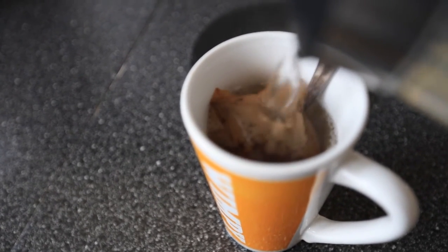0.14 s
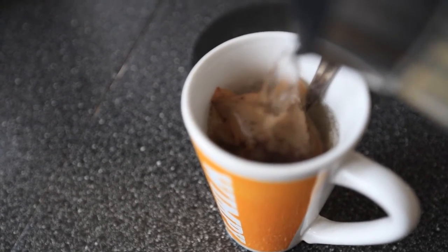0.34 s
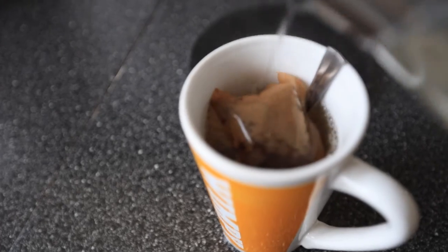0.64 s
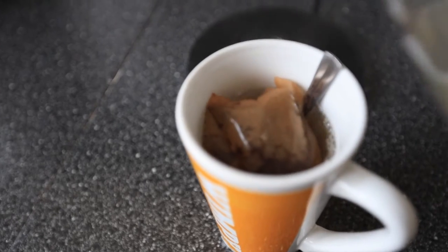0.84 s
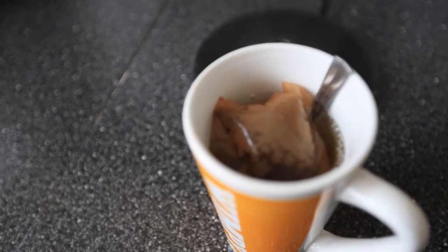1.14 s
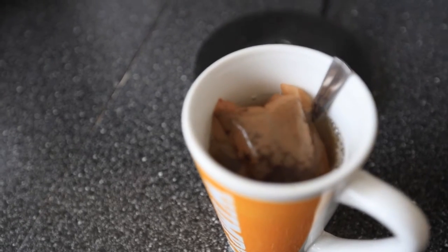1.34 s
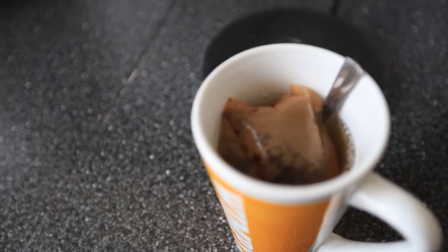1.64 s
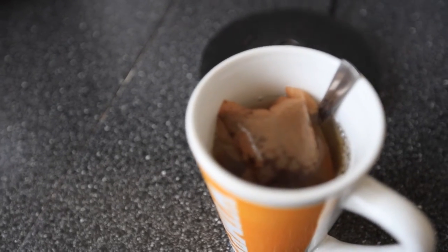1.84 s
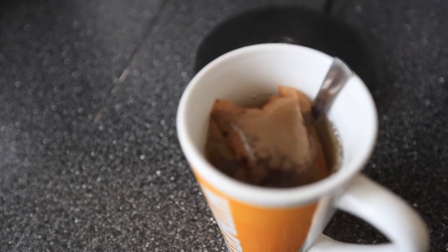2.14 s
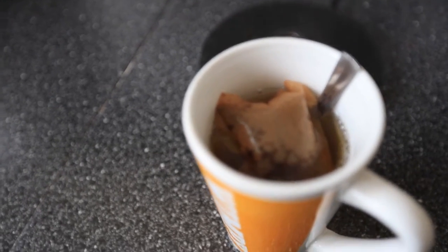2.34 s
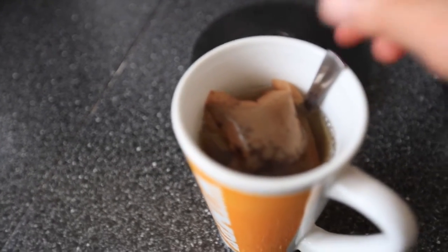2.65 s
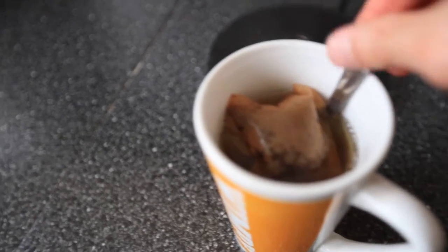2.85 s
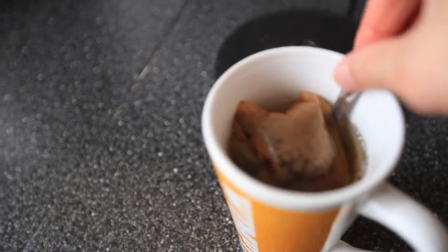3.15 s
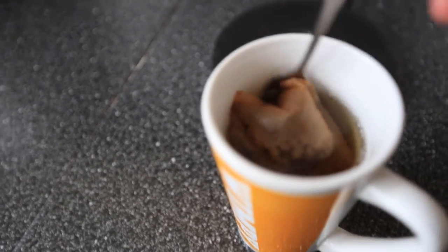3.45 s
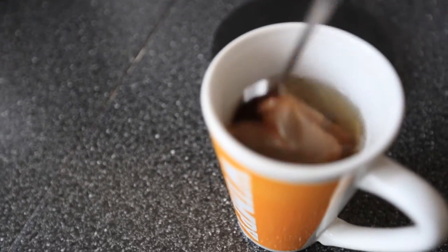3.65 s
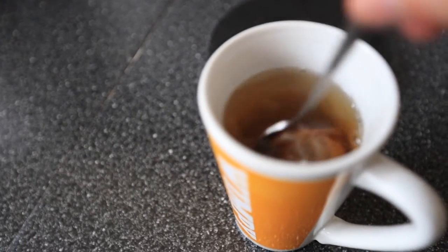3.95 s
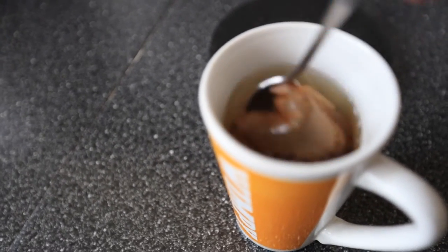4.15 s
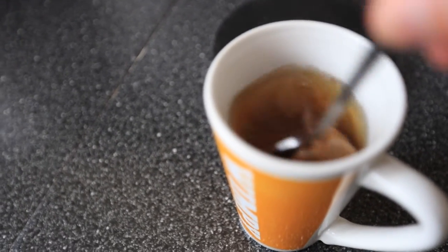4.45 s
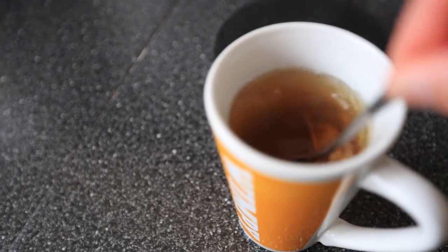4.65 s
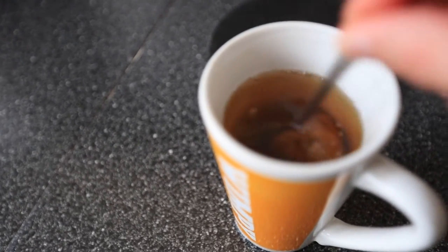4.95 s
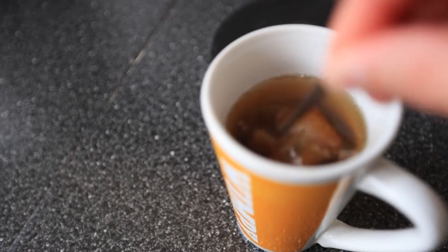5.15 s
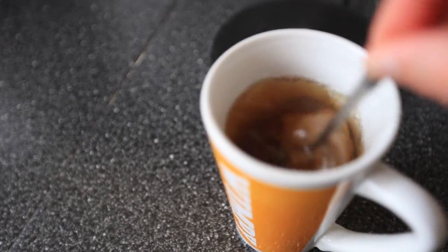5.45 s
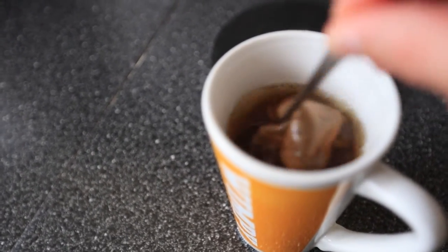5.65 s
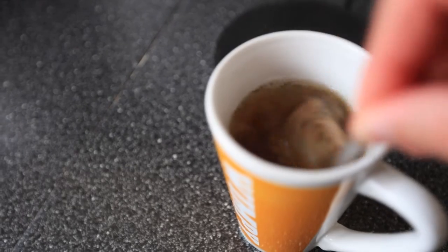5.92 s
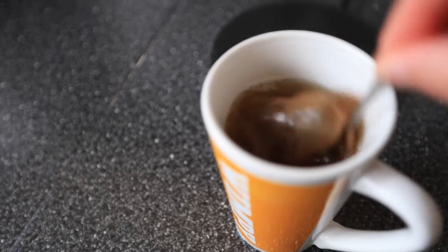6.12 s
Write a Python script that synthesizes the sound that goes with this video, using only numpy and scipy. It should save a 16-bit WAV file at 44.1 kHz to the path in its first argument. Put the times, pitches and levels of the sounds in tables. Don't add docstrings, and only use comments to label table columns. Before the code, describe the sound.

Sparse water drips, a heavy kettle clack with rattling, soft floor thuds, and bright spoon knocks against a filled ceramic mug in a quiet kitchen.

```python
import sys
import numpy as np
from scipy import signal
from scipy.fft import rfft, irfft
from scipy.io import wavfile
from scipy.ndimage import uniform_filter1d

SR = 44100
rng = np.random.default_rng(int(sys.argv[2]) if len(sys.argv) > 2 else 0)


def digitize_waveform(pressure):
    field = np.atleast_2d(pressure).T
    bounded = np.clip(field, -1, 1)
    quanta = np.round(bounded * 32767).astype(np.int16)
    wavfile.write(sys.argv[1], SR, quanta)


def nominal_scale(level):
    x = np.asarray(level, float) / 20
    return 10 ** x


N = 276948
T = np.arange(N) / SR

GROUP_HZ = [2100, 3400, 4800, 5900, 7300]


def band(x, lo_hz, hi_hz):
    edges = [lo_hz, min(hi_hz, .45 * SR)]
    return signal.sosfilt(signal.butter(2, edges, "band", fs=SR, output="sos"), x)


def noise(lo_hz, hi_hz):
    x = band(rng.standard_normal(N), lo_hz, hi_hz)
    return x / x.std()


def walk(rate):
    k = int(SR / rate)
    steps = np.repeat(rng.standard_normal(N // k + 1), k)
    x = uniform_filter1d(uniform_filter1d(steps, k), k)[:N]
    return x / x.std()


def decay(t, t60):
    return np.exp(-np.log(1000) * t / t60)


def mode(x, hz, t60):
    r, w = decay(1 / SR, t60), 2 * np.pi * hz / SR
    return signal.lfilter([0, r * np.sin(w)], [1, -2 * r * np.cos(w), r * r], x + 1e-18)


def ring(x, modes):
    return sum((-1) ** k * nominal_scale(db) * mode(x, hz, t60) for k, (hz, db, t60) in enumerate(modes))


def clicks(s, size):
    x = np.zeros(N)
    np.add.at(x, (np.asarray(s) * SR).astype(int), size)
    return x


def curve(rows, column):
    rows = np.array(rows)
    return nominal_scale(np.interp(T, rows[:, 0], rows[:, column], left=-120, right=-120))


def fade(s, rise, t60):
    out, i = np.zeros(N), int(s * SR)
    t = T[:min(N - i, int(1.5 * t60 * SR))]
    out[i:i + len(t)] = np.minimum(t / max(rise, 1e-4), 1) * decay(t, t60)
    return out


def grit(per_s):
    x = (rng.random(N) < per_s / SR) * rng.standard_normal(N)
    return x / x.std()


def shares(knocks, share_db):
    place_db = [0, 10, 0, -18, 0]
    k = np.array(knocks)
    octaves = np.log2(np.array(GROUP_HZ) / GROUP_HZ[2])
    force_db = k[:, 1:2] + share_db + k[:, 2:3] * octaves + k[:, 3:] * place_db
    return np.hstack([k[:, :1], force_db])


def knock(rows, modes_hz, modes, contact_s, first, crack_db):
    # f/Hz, level under the ring/dB
    crack_bands = [(1600, -14), (2700, -5.5), (3900, -8), (5300, -4), (6600, -4), (9000, -10.5),
                   (13000, -9.5)]
    out, t = 0, T[:800]
    chatter = rng.standard_normal((len(rows), len(t))) * np.exp(-t / contact_s) * 0.074
    chatter[:, 0] = first
    for k, (hz, (db, t60)) in enumerate(zip(modes_hz, modes)):
        force = np.zeros(N)
        for row, contact in zip(rows, chatter):
            i = int(row[0] * SR)
            total = max(abs(contact @ np.exp(2j * np.pi * hz * t)), .5)
            force[i:i + len(t)] += nominal_scale(np.interp(hz, GROUP_HZ, row[1:]) + db) * contact / total
        out = out + (-1) ** k * mode(force, hz, t60)
    for hz, db in crack_bands:
        crack = 0
        for row in rows:
            level_db = np.interp(hz, GROUP_HZ, row[1:]) + db + crack_db
            crack = crack + nominal_scale(level_db) * fade(row[0], 0.0016, 0.031)
        out = out + crack * noise(hz / 1.317, hz * 1.1)
    return out


def spoon_knocks():
    # t/s, force/dB, hardness/dB per octave, place round the wall (-0.6 to 1.4)
    tap_knocks = [
        (3.0234, -32, 2, 0),
    ]
    high_knocks = [
        (3.2276, -17.5, -0.5, 0.75),
        (3.248, -30, 5, .5),
        (3.2944, -37.5, -7, 0.74),
    ]
    side_knocks = [
        (3.3515, -61, 8, 1.4),
        (4.2996, -20.5, 0.9, -0.23),
        (4.3164, -23.5, -2, -0.6),
    ]
    deep_knocks = [
        (5.0435, -17.5, 1.7, 0.022),
        (5.7, -21, -2, 0.016),
    ]
    last_knocks = [
        (5.9748, -20, 0, 0.0028),
        (5.9785, -21, 0.0043, 0),
    ]
    mug_hz = [2006, 2112, 2850, 3370, 3800, 4400, 4785, 5300, 5905, 5975, 6735, 7060, 7660, 9700, 10450,
              11120, 12550, 13370, 15150]
    deep_hz = [1985, 2138, 2850, 3375, 3854, 4600, 4915, 5170, 5832, 5882, 6730, 7085, 7375, 7650, 8500,
               9636, 10440, 12670]
    tap_hz = [1981, 3000, 4834, 5975, 7068, 8086, 10070, 11280]
    last_hz = [1640, 2230, 2850, 3800, 4775, 4830, 5911, 6535, 6971, 7052, 7655, 9609, 11100, 11690, 13370]
    # level/dB, time to die away by 60 dB/s
    rim = [(2, 0.079), (-4, 0.06), (-10, 0.029), (-1, 0.11), (2.5, 0.021), (-42, 0.02), (0.5, 0.046),
           (-17, 0.15), (17, 0.03), (-18, 0.0678), (6, 0.0087), (4.5, 0.051), (-1.5, 0.025), (-15, 0.078),
           (-26, 0.051), (-11, 0.049), (-19.5, 0.066), (-19, 0.066), (-20, .05)]
    side_wall = [(-13, 0.19), (-0.5, 0.092), (3, 0.027), (2.3, 0.044), (-26, 0.052), (-11, 0.067),
                 (-1.5, 0.063), (-21, 0.026), (-11, 0.12), (0, 0.04), (-7, 0.054), (-3, 0.12), (-6.5, 0.18),
                 (-15, 0.07), (-3.5, 0.053), (-4, 0.041), (-22, .07), (-32, .06), (-31, .05)]
    deep = [(-16, 0.27), (2, 0.051), (-29, 0.022), (4.5, 0.17), (-16, 0.04), (-18, 0.046), (-5.5, 0.054),
            (-23, 0.054), (3.5, 0.02), (3, 0.055), (3.5, 0.036), (-1.5, 0.044), (2, 0.034), (5, 0.041),
            (-38, 0.056), (-10.5, 0.048), (-8.5, 0.022), (-19, 0.063)]
    tap = [(-1.5, 0.094), (-20, 0.016), (-3, 0.038), (-8, 0.034), (2.5, 0.04), (-13, 0.026), (-9.5, .04),
           (-23, 0.024)]
    last = [(-10, .03), (-13, 0.028), (-29, .02), (-20, 0.016), (6, 0.077), (-1, 0.044), (-6, .06),
            (-18, 0.048), (3.5, 0.037), (7.5, 0.052), (-8.5, .05), (-8, 0.04), (-4, 0.047), (-13, .05),
            (-22, .05)]
    rim_share_db = [-12.5, -28, -1, -21, -4.5]
    side_share_db = [3.5, 2.5, 2, -1.5, -4.5]
    deep_share_db = [-2.5, -15.5, 2, 0.5, -4]
    out = knock(shares(high_knocks, rim_share_db), mug_hz, rim, 0.0046, 0.19, -.1)
    out = out + knock(shares(side_knocks, side_share_db), mug_hz, side_wall, 0.0022, 0.43, -.1)
    out = out + knock(shares(deep_knocks, deep_share_db), deep_hz, deep, 0.0045, 0.53, -.1)
    out = out + knock(shares(tap_knocks, 0), tap_hz, tap, 0.0035, 0.26, -3)
    return out + knock(shares(last_knocks, 0), last_hz, last, 0.0021, 0.24, -13)


def scrape(strokes, modes_hz, modes):
    at_rim_db = [-5, -26, -23, 11.5]
    deep_down_db = [-17.5, 0.5, -28, -16.5]
    # f/Hz, level/dB, time to die away by 60 dB/s
    rasp_modes = [(8700, 0, .012), (9700, -1, .02), (10450, 1, .02), (11120, -11, 0.018), (12550, -5, .025),
                  (13600, -6, .02), (14500, -3, .015), (15200, -2, .02)]
    rows = np.vstack(strokes)
    pressure = uniform_filter1d(sum(curve(part, column=1) for part in strokes), size=400)
    depth = np.interp(T, rows[:, 0], rows[:, 2])
    gains = [pressure * nominal_scale(rim_db + depth * (deep_db - rim_db))
             for rim_db, deep_db in zip(at_rim_db, deep_down_db)]
    upper = np.clip((depth - 0.51) / (0.95 - 0.51), 0, 1)
    out = nominal_scale(-6.0) * gains[0] * (noise(300, 780) + noise(940, 2100.0))
    rasp = ring(grit(per_s=4600), rasp_modes)
    out = out + nominal_scale(-17 + 3.4 * walk(60)) * gains[3] * rasp / rasp.std()
    for k, (hz, (db, t60)) in enumerate(zip(modes_hz, modes)):
        sound = mode(grit(per_s=700), hz, t60)
        if hz < 4000:
            sound = sound / uniform_filter1d(abs(sound), size=1300) ** .6
        share = {2: 1 - upper, 3: upper}.get(k, 1)
        group = np.searchsorted([1800, 3000, 4200], hz)
        out = out + nominal_scale(db + 3.6 * walk(45)) * share * gains[group] * sound / sound.std()
    return out


def spoon_scrapes():
    # t/s, pressure/dB, depth (0 rim, 1 deep)
    strokes = [
        [(2.93, -73, .3), (2.95, -44, 0.85), (3.0, -68, .05), (3.05, -61, .4), (3.096, -71, 0.06),
         (3.146, -63, .02), (3.2, -56.5, .05)],
        [(3.229, -38, .1), (3.255, -35, 0.36), (3.275, -36, 0.53), (3.321, -45, 0.35), (3.345, -36.5, 0.81),
         (3.363, -39.5, 0.71), (3.471, -46, 0.87), (3.5, -62, .1)],
    ]
    last_strokes = [
        [(5.99, -28.5, 0.27), (6.025, -42, 0.36), (6.058, -37.5, 0.59), (6.08, -39.5, 0.99), (6.112, -46, 1),
         (6.128, -41.5, 1), (6.175, -41.5, 0.8), (6.195, -62, 0.95), (6.275, -70, 0.79)],
    ]
    scraped_hz = [1200, 1270, 2006, 2125, 3370, 4785, 5905, 5975, 6735, 7060, 7660]
    last_scraped_hz = [1050, 1290, 1945, 2120, 1630, 1760, 2250, 2570, 4775, 6971, 7052, 9500, 11100]
    # level/dB, time to die away by 60 dB/s
    scraped = [(1, 0.035), (2, 0.064), (-4.5, 0.049), (-2.5, 0.18), (8, 0.22), (-20.5, .12), (-19.5, 0.048),
               (-15, 0.054), (-26, .1), (-19, 0.16), (-14.5, 0.11)]
    last_scraped = [(-10, .03), (-5, 0.033), (7, 0.081), (3, 0.31), (-10, .06), (-14, .06), (-14, .03),
                    (-31, 0.055), (-14, 0.034), (-13, .06), (-16, .06), (-24, .06), (-25, .05)]
    return scrape(strokes, scraped_hz, scraped) + scrape(last_strokes, last_scraped_hz, last_scraped)


def jolts():
    # t/s, worktop level/dB, handle level/dB
    shaken = [
        (3.024, -58, -32),
        (3.226, -41, -36),
        (4.302, -39.5, -41),
        (5.041, -34, -40.5),
        (5.7, -37.5, -42),
        (5.974, -37.5, -27.5),
    ]
    # f/Hz, level/dB, time to die away by 60 dB/s
    handle = [(1044, -5.5, 0.086), (1195, 2.5, 0.051), (1290, 1, 0.052), (1770, -34, 0.03488)]
    out, tea = 0, noise(245.0, 890)
    worktop_hz, t60 = 164, 0.18
    for s, top_db, handle_db in shaken:
        out = out + nominal_scale(top_db) * fade(s, 0.01, t60) * np.sin(2 * np.pi * worktop_hz * (T - s))
        out = out + nominal_scale(-41) * fade(s, 0.0049, t60) * tea
    rows = np.array(shaken)
    return out + ring(clicks(rows[:, 0], nominal_scale(rows[:, 2] - 1.5)), handle)


def drops():
    # t/s, peak level/dB, snap f/Hz, splash above 4 kHz level/dB
    water_drops = [(0.0094, -41, 1290, -47), (0.0581, -31.5, 3070, -54), (0.065, -39, 1310, -58),
                   (0.2646, -46, 6400, -45), (0.2752, -44, 6490, -43.5), (0.2837, -34.5, 3420, -59),
                   (0.2942, -39, 1310, -64), (0.363, -33.5, 8400, -60), (0.3671, -37, 1310, -59),
                   (0.384, -37, 3191, -60), (0.402, -26, 3350, -44), (0.457, -40, 1290, -67),
                   (0.557, -45, 1420, -48.5), (0.593, -38, 2540, -59), (0.6215, -52, 2600, -40),
                   (0.6239, -13.5, 2370, -28), (0.642, -48, 1834, -37), (0.6621, -38, 1090, -52),
                   (0.6651, -23, 1360, -33), (0.6957, -24.5, 3300, -43.5), (0.8354, -43, 1800, -43),
                   (5.3393, -40, 1160, -36.5), (5.3993, -34.5, 1650, -45)]
    # t/s, peak level/dB, snap f/Hz, fine edge level/dB
    dry_ticks = [(1.1403, -38, 5500, -57), (1.5062, -9.5, 1230, -50), (1.84, -30, 1400, -60),
                 (2.107, -18.5, 2190, -42), (2.5592, -42, 3260, -50), (2.9353, -36, 2580, -59),
                 (3.285, -37, 3900, -52), (3.4962, -37, 7100, -57), (3.5127, -20.5, 2470, -63),
                 (4.467, -34.5, 700, -65), (4.5441, -33.5, 3900, -64), (4.571, -38, 3186, -58),
                 (4.581, -37, 2269, -67), (5.932, -40, 1500, -62)]
    # t/s, level/dB
    dribble = [
        (0.0, -44),
        (0.316, -78),
        (0.606, -70),
        (1.0, -53),
    ]
    out, hiss, t = np.zeros(N), noise(3950, 16200), T[:6000]
    lasts = [0.016 * 2 ** ((row[1] + 40) / 20) for row in water_drops] + [0.055] * len(dry_ticks)
    for (s, db, hz, splash_db), t60 in zip(water_drops + dry_ticks, lasts):
        i = int(s * SR)
        snap = -np.sin(2 * np.pi * hz * t) * np.exp(-t * hz / 1.1)
        grain = rng.standard_normal(len(t)) * np.minimum(t / 0.0006, 1) * decay(t, t60)
        spray = band(grain, hz / 2.0, hz * 1.32) * np.sqrt(8000 / hz)
        splash = hiss[i:i + len(t)] * (np.exp(-t / 0.000072) + 0.21 * decay(t, t60))
        out[i:i + len(t)] += nominal_scale(db + 2.5) * snap + nominal_scale(db - 9.5) * spray + nominal_scale(splash_db + 8.5) * splash
    out = out + .9 * band(np.roll(out, int(.0032 * SR)), 3000, 4100)
    fizz = band(grit(per_s=620), 680, 4300)
    return out + curve(dribble, column=1) * nominal_scale(-11) * fizz / fizz.std()


def kettle():
    # t/s, weight/dB, clack/dB, extra when on its edge/dB
    landings = [(1.482, -32, -38.5, 11), (1.5058, 2, -5, 0), (1.529, -23, -32, -1), (1.554, -20, -33, .1),
                (1.61, -5, -16.5, 2.5), (1.637, -11, -19, -11), (1.658, -40, -24, -15),
                (1.7, -23, -24, -26), (1.781, -17, -63, 6), (1.839, -15, -38, 7), (1.86, -1, -24.5, 7),
                (1.905, -2.5, -24, 6), (1.917, -13, -18, 19), (1.939, -10.5, -39, -4), (1.975, -27, -35, 9),
                (2.009, -25, -43, -2)]
    # t/s, level/dB
    slide = [
        (1.5, -68),
        (1.668, -35.5),
        (1.726, -40),
        (1.874, -44),
        (2.1, -60),
    ]
    # f/Hz, level/dB, time to die away by 60 dB/s
    worktop = [(115.6, -2, 0.18), (153.6, 1, 0.059), (200, -5.5, 0.059), (254.5, -8.5, 0.076)]
    base = [(345, -3.5, 0.093), (421, -4, 0.12), (519, -6.5, 0.096), (616, -3.5, 0.06), (692, 2.5, 0.041),
            (787, 1.5, 0.053), (820, -3.5, 0.065)]
    shell = [(932, -8.5, 0.028), (1087, -5.5, 0.041), (1241, -1, 0.038), (1336, -0.5, 0.039),
             (1500, -6.5, 0.032), (1840, -16.5, 0.017), (2070, -22.5, 0.036)]
    blow_db = [-8.5, -11, -9.5]
    rattle_db = [-24, -10.5, -10.5]
    slide_db = [8.5, -0.2, -7, -15.5]
    s, weight, clack, edge = np.transpose(landings)
    base_blow, treble = (weight + clack) / 2 - 13.5 + edge, clack - 19.5 + edge
    rows = np.transpose([s, weight, base_blow, clack, treble])
    out, grind = 0, curve(slide, column=1)
    for k, body in enumerate((worktop, base, shell)):
        rumble = ring(grit(per_s=1700), [(hz, db, 0.23 * t60) for hz, db, t60 in body])
        rattle = sum(nominal_scale(row[k + 1] + rattle_db[k]) * fade(row[0], 0.0012, 0.079) for row in rows)
        sign = 1 if k else -1
        out = out + ring(clicks(rows[:, 0], sign * nominal_scale(rows[:, k + 1] + blow_db[k])), body)
        out = out + rumble / rumble.std() * (grind * nominal_scale(slide_db[k]) + rattle)
    tick = sum(nominal_scale(row[4] - 5.0) * fade(row[0], 0.0036, 0.077) for row in rows)
    tick = tick + grind * nominal_scale(slide_db[3])
    return out + tick * (noise(1500, 3150) + nominal_scale(-11.5) * noise(4400, 8200))


def thuds():
    # t/s, boom/dB, knock/dB, shuffle/dB, time to die away by 60 dB/s
    steps = [(1.95, -44, -60, -70, 0.27), (2.289, -31, -47, -48, 0.15), (2.366, -34.5, -66, -58, 0.39),
             (2.799, -38.5, -45, -71, 0.45), (2.893, -57, -47, -65, 0.46), (2.932, -47, -36, -43, 0.47),
             (3.04, -61, -32.5, -55, 0.67), (3.486, -31, -34, -41, 0.54), (3.511, -40, -24.5, -29.5, 0.41),
             (3.899, -39, -46.5, -69, 0.38), (4.011, -28.5, -31.5, -50, 0.28), (4.465, -52, -25, -42, 0.56),
             (4.553, -21, -34, -62, 0.39), (4.567, -37, -34.5, -35, 0.35), (4.699, -30, -69, -75, 0.25),
             (5.152, -41, -30.5, -39, 0.51)]
    # t/s, level/dB, f/Hz, time to die away by 60 dB/s
    cupboard = [
        (0.622, -25.5, 1900, 0.063),
        (2.106, -28, 2470, 0.095),
        (3.042, -27.5, 350, 0.2),
        (5.5, -40, 740, 0.071),
    ]
    # t/s, level/dB
    heels = [(2.37, -35), (2.892, -43), (3.487, -31.5), (3.528, -39), (4.012, -45), (4.552, -27),
             (4.569, -44), (4.601, -35), (4.633, -33), (4.698, -42), (4.739, -40), (5.16, -35)]
    # f/Hz, level/dB, time to die away by 60 dB/s
    floor = [(49, -6, 0.23), (60.5, -5.5, 0.18), (96, -6.5, .25)]
    layers, out = [band(noise(45, 126), 41, 240), noise(120, 660.0), noise(1450, 2930)], 0
    layers = [layer * nominal_scale(2 * walk(rate) - 1.3) for layer, rate in zip(layers, (20, 90, 150))]
    for s, *db, t60 in steps:
        for k, late in enumerate((.02, .004, 0)):
            swell = fade(s, 0.0085 + late, t60 * (1 + 8 * late))
            out = out + swell * nominal_scale(db[k] - 8.0) * layers[k]
    for s, db, hz, t60 in cupboard:
        out = out + nominal_scale(db + 3 * walk(60)) * fade(s, 0.0075, t60) * np.sin(2 * np.pi * hz * (T - s))
    s, db = np.transpose(heels)
    return out + ring(uniform_filter1d(clicks(s, nominal_scale(db)), size=130), floor)


def kitchen():
    # f/Hz, level/dB per Hz
    air_colour = [(79, -48), (135, -8), (210, -2.5), (284, -3.5), (519, -8.5), (650, -9), (912, -11),
                  (1340, -13), (2500, -16.5), (4500, -24), (7000, -23), (12000, -25.5), (15200, -29.5),
                  (16500, -49)]
    hz, db = np.transpose(air_colour)
    f = np.maximum(np.fft.rfftfreq(N, 1 / SR), 1)
    air = irfft(rfft(rng.standard_normal(N)) * nominal_scale(np.interp(np.log(f), np.log(hz), db)), N)
    air *= nominal_scale(-55 + .7 * walk(4.49)) / band(air, 100, 18700).std()
    rumble = nominal_scale(-64) * band(noise(26, 116), 27, 280)
    hum_hz = 99.2 * (1 + 0.0036 * walk(6.6))
    hum = np.sin(2 * np.pi * np.cumsum(hum_hz) / SR)
    return air + rumble + np.sqrt(2) * nominal_scale(-56.5 + 0.46 * walk(6.6)) * hum


def room(x):
    t = T[:SR // 2]
    start = np.clip((t - .002) / 0.016, 0, 1)
    lows = noise(61, 2300)[:len(t)] * decay(t, 0.41)
    treble = 1.21 * noise(1430.0, 13600)[:len(t)] * decay(t, 0.4)
    lines = rfft(start * (lows + treble))
    lines /= np.maximum(abs(lines) / uniform_filter1d(abs(lines), size=150), 1)
    tail = start * irfft(lines, len(t)) * np.minimum((t[-1] - t) / .15, 1) ** 2
    return x + nominal_scale(-14) * signal.fftconvolve(x, tail / np.sqrt(np.sum(tail ** 2)))[:N]


def scene():
    near = spoon_knocks() + spoon_scrapes() + jolts() + drops() + kettle()
    return (room(band(near, 88, 15500)) + thuds() + kitchen())[None]


def top_cut(x):
    return signal.sosfilt(signal.butter(12, 16980, fs=SR, output="sos"), x)


def record(dry):
    duck_db, duck_from_db, release_s = -0.03, -48, 1
    keep = np.exp(-1 / (release_s * SR))
    loud = signal.lfilter([1 - keep], [1, -keep], dry ** 2)
    levelled = dry * nominal_scale(-duck_db * np.log10(1 + loud / nominal_scale(2 * duck_from_db)))
    top_hz = 16900
    cut = signal.sosfilt(signal.ellip(8, .2, 70, top_hz, fs=SR, output="sos"), levelled)
    return top_cut(cut)


dry = scene()
out = record(dry)
digitize_waveform(out)
```